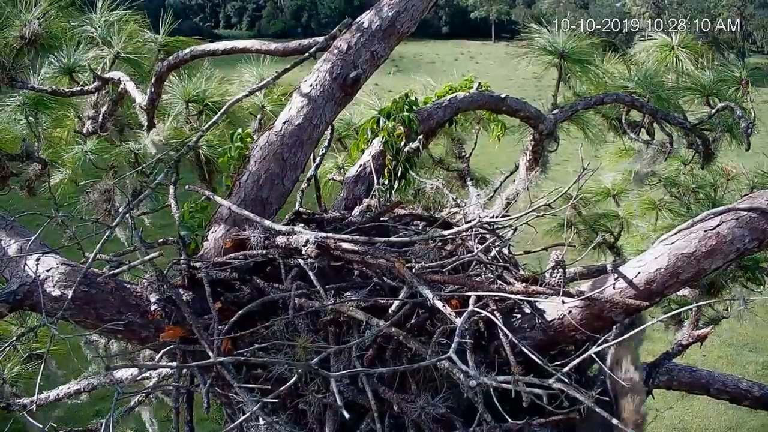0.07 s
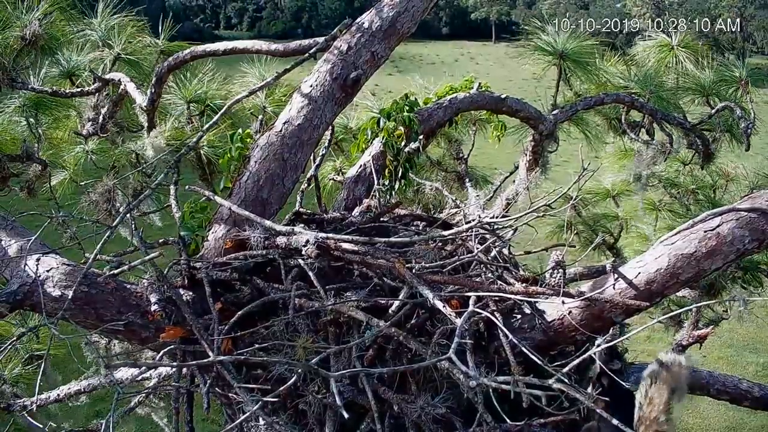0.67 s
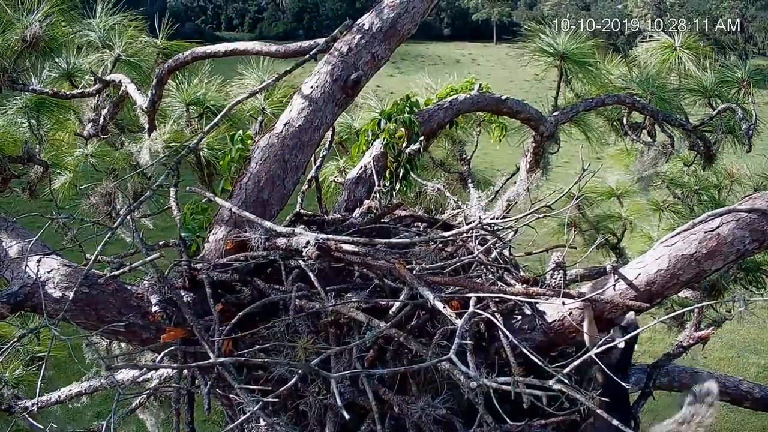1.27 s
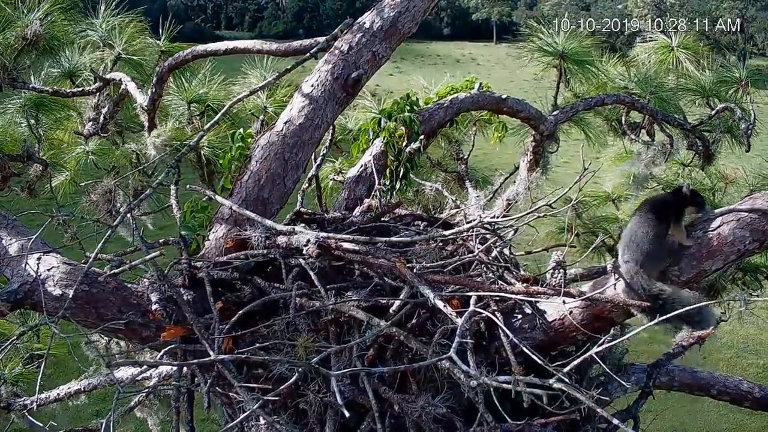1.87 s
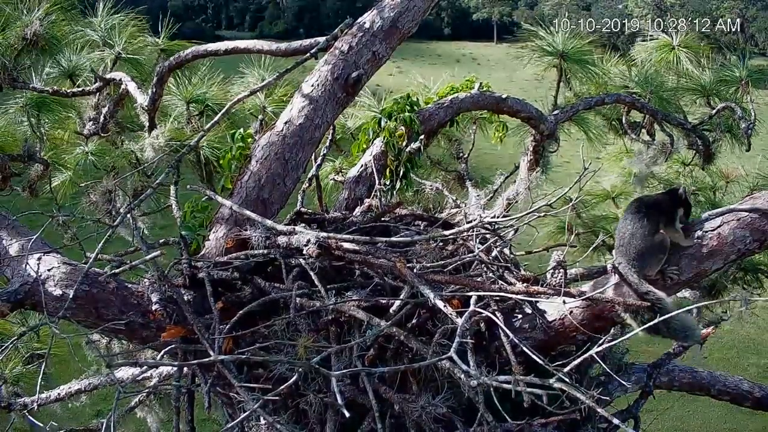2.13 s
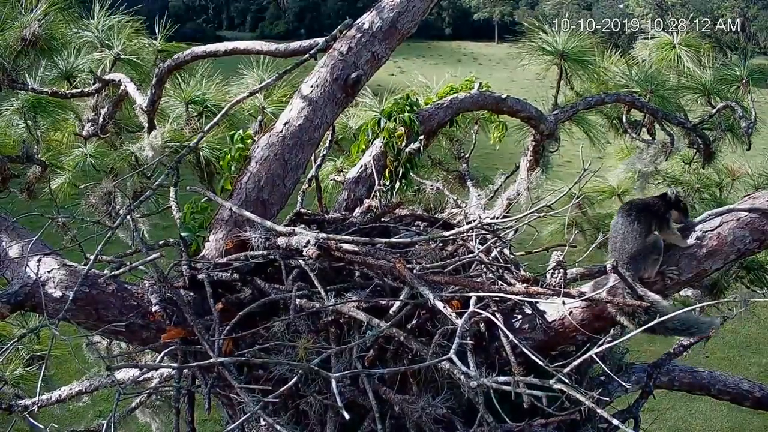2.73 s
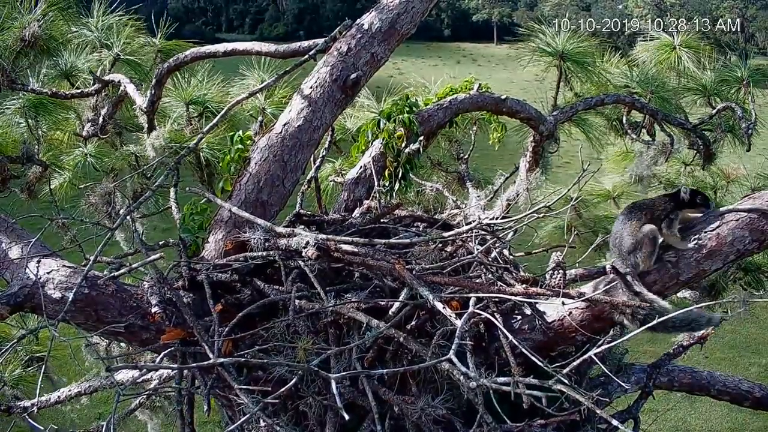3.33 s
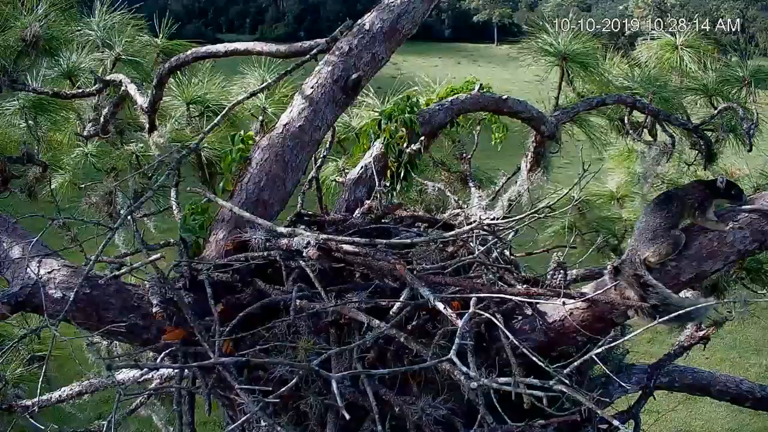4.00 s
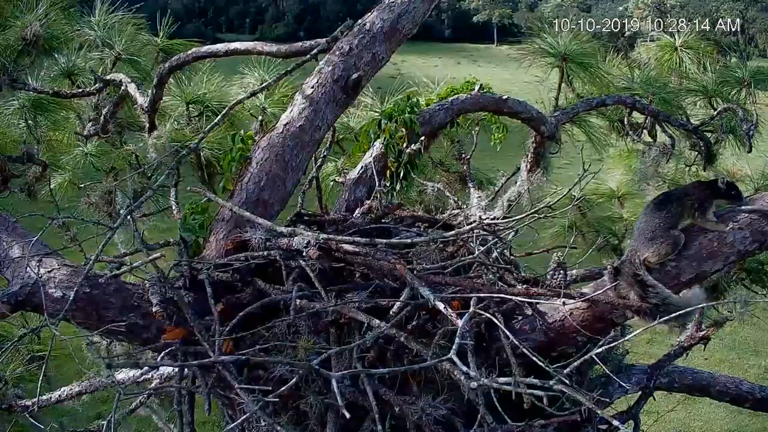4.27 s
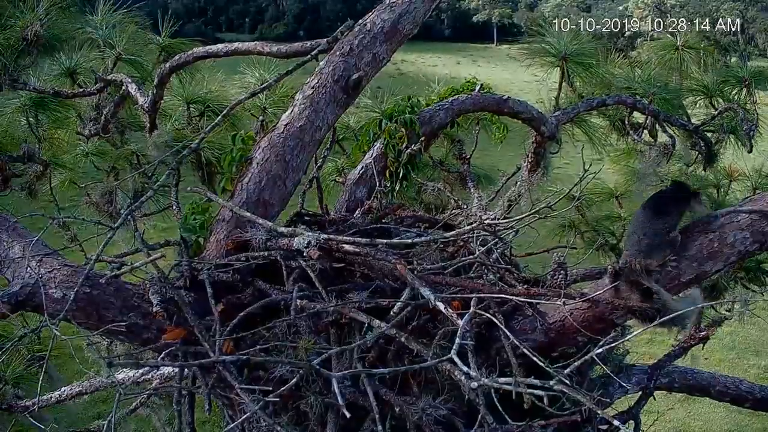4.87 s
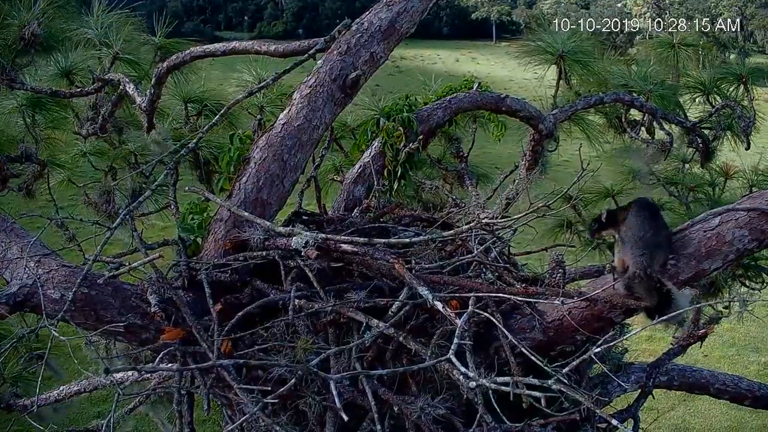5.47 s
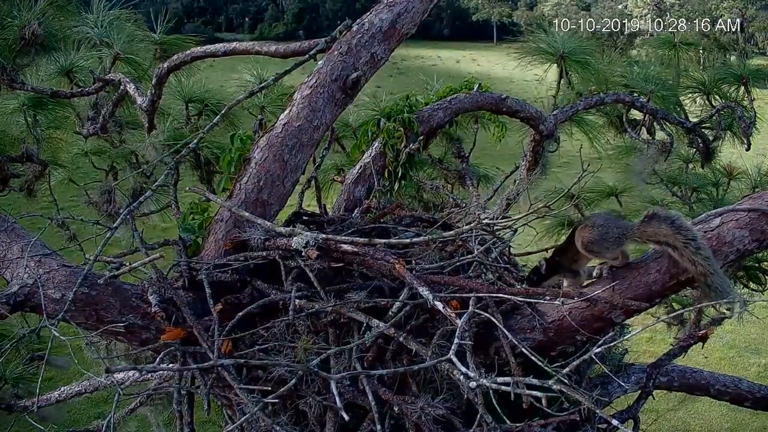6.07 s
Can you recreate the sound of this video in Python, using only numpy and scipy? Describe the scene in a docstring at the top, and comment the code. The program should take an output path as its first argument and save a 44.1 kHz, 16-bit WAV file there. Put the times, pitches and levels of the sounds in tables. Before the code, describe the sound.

Outdoors in a pine tree, one microphone picks up soft low wind, distant traffic, a far machine's hum and whine, and a faint hiss with insects. After one weak, echoing cry, a bird of prey gives five close, drawn-out screams, a little over a second apart, and starts a sixth. Each whistle jumps up, slides slowly down and rasps at its edges, ringing briefly among the trunks.

```python
"""A hawk-like bird screams again and again among pines, once faintly, then near the microphone.
Each call is a harmonic whistle that leaps up, sags slowly and drops away, rasping where the pitch
moves fast; trunks and crowns echo it. Farther off are soft wind, the tyres of distant traffic and the
hum and thin whine of a machine, with a hiss and high insects on top."""
import sys
import numpy as np
from scipy import signal
from scipy.fft import rfft, irfft, next_fast_len
from scipy.io import wavfile
from scipy.ndimage import uniform_filter1d, map_coordinates

SR = 44100
rng = np.random.default_rng(int(sys.argv[2]) if len(sys.argv) > 2 else 0)


def unload_wav(signal):
    """Save mono or channel-first audio to the path in sys.argv[1] as 16-bit WAV at rate SR, clipped to [-1, 1]."""
    wavfile.write(
        sys.argv[1],
        SR,
        np.round(np.clip(np.atleast_2d(signal).T, -1, 1) * 32767).astype(np.int16),
    )


N = 274743

# The held part of each call, between leap and drop, one list a call.
# Each row: time in seconds, fundamental in Hz, level of the second partial in dB.
CALL_HOLDS = [
    [(0.0, 1383, -63.5), (0.08, 1295, -66), (0.14, 1230, -66)],
    [(0.495, 1521, -49), (0.575, 1495, -45.5), (0.605, 1487, -51.5), (0.645, 1433, -43.5),
     (0.745, 1399, -47.5), (0.785, 1390, -71), (0.815, 1373, -53.5), (0.915, 1380, -49),
     (1.005, 1218, -53.5), (1.045, 1389, -52), (1.105, 1260, -56.5)],
    [(1.466, 1492, -45.5), (1.496, 1495, -41), (1.567, 1464, -51), (1.607, 1440, -47), (1.647, 1402, -52.0),
     (1.768, 1375, -53.0), (1.919, 1296, -63.5), (2.019, 1270, -56.5), (2.13, 1190, -62.5)],
    [(2.736, 1477, -47), (2.826, 1528, -54.5), (3.037, 1409, -41), (3.118, 1364, -53.0), (3.148, 1383, -52),
     (3.178, 1372, -59), (3.278, 1342, -52.5), (3.389, 1294, -57), (3.449, 1344, -53), (3.509, 1277, -50),
     (3.59, 1306, -57), (3.64, 1226, -55)],
    [(4.06, 1466, -42.5), (4.07, 1472, -38.5), (4.12, 1468, -53), (4.18, 1450, -47.0), (4.23, 1440, -55.0),
     (4.26, 1405, -49.5), (4.34, 1378, -47.5), (4.57, 1344, -61.5), (4.61, 1322, -52.5),
     (4.67, 1311, -58.5), (4.79, 1209, -50.5)],
    [(5.184, 1460, -48.5), (5.265, 1468, -44.5), (5.345, 1405, -42.5), (5.406, 1382, -41.5),
     (5.497, 1351, -75), (5.527, 1335, -64), (5.578, 1326, -60.5), (5.81, 1207, -56.5), (5.84, 1168, -56)],
    [(6.168, 1427, -44), (6.199, 1440, -42.5), (6.23, 1430, -45)],
]
# The voice of each call. Each row: length of the leap in seconds, then in dB how much weaker it starts,
# fundamental early and late, upper partials early and late, extra squeak in the leap and in the drop.
CALL_VOICES = [(.06, 20, -76, -74, 0, -18, 0, -8), (.056, 19, -62.5, -64, -2.5, -1, -5, -10),
               (.058, 35, -62, -79, -1, -5, 9, -7), (.064, 24, -62.5, -63, -0.5, -2, 2.5, -3),
               (.066, 20, -56, -69, 0, 0.5, 11.5, 3), (.052, 23, -59, -62, -1.5, -0.5, 9.5, 4),
               (.046, 24, -58.5, -61, 1, 3, 4, 0)]
# How the machine runs. Each row: time in seconds, relative speed, whine and hum gains in dB.
MACHINE_RUN = [(0, .997, -13, -75), (1.5, .9985, -11, -68), (2.5, .999, -7, -68), (3.3, 1, -4, -76),
               (4.1, 1, 0, -70), (4.8, 1, 1.5, -63), (5.3, .997, 1.5, -64), (6.23, .99, 2, -73)]
# The swell of the far road. Each row: time in seconds, level in dB.
TRAFFIC_SWELL = [(0, -56), (1.1, -63), (1.6, -61), (2.1, -55.5), (2.75, -53.5), (3.7, -56.5), (4.9, -61),
                 (6.23, -60)]


def bird(side_ratio=1.77, low_half_db=-11):
    """The near bird's calls; at moments its voice splits into a side tone or doubles its period."""
    # When the voice splits in each way. Each row: start in seconds, end in seconds, level in dB.
    side_tones = [(4.1, 4.22, -64), (4.4, 4.5, -75), (5.41, 5.49, -67), (5.57, 5.66, -72)]
    doublings = [(.62, .8, -72), (4.36, 4.52, -71), (5.36, 5.5, -69)]
    pitch = curves(np.concatenate(CALL_HOLDS))[0]
    half_partials = tone(2.5 * pitch) + amp(low_half_db) * tone(1.5 * pitch)
    unsteady = amp(2.5 * wobble(60))
    split = spells(side_tones) * tone(side_ratio * pitch) + spells(doublings) * half_partials
    calls = sum(scream(hold, voice) for hold, voice in zip(CALL_HOLDS[1:], CALL_VOICES[1:]))
    return calls + unsteady * split


def scream(hold, voice, drop_fade_db=13.5, upper_swing_db=3):
    """One call: a harmonic whistle whose second partial carries; it rasps in the quick leap and drop."""
    leap_s, weak_db, first_early, first_late, upper_early, upper_late, leap_db, drop_db = voice
    pitch, leap, drop = pitch_arc(hold, leap_s)
    gate = np.clip((1 - leap - drop) / .21, 0, 1)
    first_db, upper_db = curves([(hold[0][0], first_early, upper_early),
                                 (hold[-1][0], first_late, upper_late)])
    second_db = curves(hold)[1] - weak_db * np.sqrt(leap) - drop_fade_db * drop
    # the membrane loses its steady swing while the pitch changes fast
    sweep_hz_per_s = uniform_filter1d(np.abs(np.gradient(pitch)) * SR, size=600)
    rasp = np.clip(sweep_hz_per_s / 8500, 0, 1) ** 2
    pitch = pitch * (1 + .0028 * wobble(22) + .0033 * wobble(130))  # slow waver, quick jitter
    pitch = pitch * (1 + .014 * rasp * wobble(500))
    rasp_db = rasp * (3 * wobble(300) - 1)
    # the whistle flutters more deeply where it is blown weakly
    flutter_db = np.interp(second_db, [-60, -45], [4.4, 1.2])
    squeak_db = leap_db * np.minimum(6 * leap, 1) + drop_db * np.minimum(6 * drop, 1)
    uppers = [upper_db + throat(k * pitch, squeak_db) + upper_swing_db * wobble(16) for k in (3, 4, 5)]
    return gate * sum(amp(db + rasp_db + flutter_db * np.minimum(wobble(75), 1)) * tone(k * pitch)
                      for k, db in enumerate([first_db, second_db] + uppers, 1))


def pitch_arc(hold, leap_s, leap_depth=.44, leap_bend=1.4, drop_s=.064, drop_depth=.33, drop_bend=1.8):
    """The pitch through leap, hold and drop, and how deep in the leap and the drop the call is (0-1)."""
    t = np.arange(N) / SR
    leap = np.clip((hold[0][0] - t) / leap_s, 0, 1)
    drop = np.clip((t - hold[-1][0]) / drop_s, 0, 1)
    pitch = curves(hold)[0] * (1 - leap_depth * leap ** leap_bend - drop_depth * drop ** drop_bend)
    return pitch, leap, drop


def throat(hz, squeak_db, squeak_hz=3900, width_hz=490):
    """The throat's gain in dB; upper partials squeak as they sweep through its resonance."""
    # What it passes of the third and higher partials. Each row: frequency in Hz, gain in dB.
    passband = [(2400, -77), (2900, -62.5), (3400, -57.5), (3800, -58.5), (4100, -61.5), (4500, -65.5),
                (4900, -70.5), (5600, -77.5), (6200, -79), (7200, -89.5)]
    return along(passband, hz) + squeak_db * np.exp(-.5 * ((hz - squeak_hz) / width_hz) ** 2)


def pines(calls, build_s=.0078):
    """Trunks and crowns scatter a call; the echo of its higher start beats against the sagging pitch."""
    # How long the wood rings. Each row: frequency in Hz, seconds to fade by 60 dB.
    ring_times = [(1000, 0.34), (3000, 1), (8000, 1)]
    hz, t, noise = signal.stft(rng.standard_normal(SR), SR, nperseg=256)
    envelope = amp(-60 * t / along(ring_times, hz)[:, None]) * (1 - np.exp(-t / build_s))
    tail = signal.istft(noise * envelope, SR, nperseg=256)[1]
    return signal.fftconvolve(calls, tail / np.linalg.norm(tail))[:N]


def machine(whine_trim_db=-1.5, hum_trim_db=-3.5, whine_fading_db=3.5, hum_fading_db=2):
    """A far engine hums and whines; moving air on the way makes each line fade by itself."""
    # The rotor's strong lines, its weak high lines and the engine's hum.
    # Each row: frequency in Hz, relative level in dB.
    rotor_lines = [(3488, -68), (3564, -81), (3833, -70), (3967, -71), (4070, -62), (4177, -64),
                   (4549, -66.5), (4657, -79), (4986, -90), (5028, -70), (5136, -72.5), (5507, -76),
                   (5987, -79.5)]
    high_lines = [(6228, -84), (6465, -90), (6708, -90), (6944, -83.5), (7187, -81.5), (7424, -82),
                  (7531, -87), (7628, -91), (7666, -80), (7773, -88), (8010, -87), (8145, -84.5),
                  (8247, -86.5)]
    hum_lines = [(68, -6), (102.3, 1), (120, -11.5), (136, -19), (204, -9), (239, -11)]
    speed, whine_db, hum_db = curves(MACHINE_RUN)
    speed = speed * (1 + .0001 * wobble(11))
    whine = sum(amp(db + whine_fading_db * wobble(2.95)) * tone(hz * speed)
                for hz, db in rotor_lines + high_lines)
    hum = sum(amp(db + hum_fading_db * wobble(6)) * tone(hz * speed * (1 + .0029 * wobble(4.03)))
              for hz, db in hum_lines)
    return amp(whine_db + whine_trim_db) * whine + amp(hum_db + hum_trim_db) * hum


def wind(level_db=-56.5, follow=.34):
    """Soft wind, a low rush that rises and falls a little with the traffic."""
    # The colour of the air. Each row: frequency in Hz, relative density in dB.
    air_spectrum = [(15, -47), (25, -25), (55, -9), (120, -9), (170, -11), (280, -9), (520, -7.5),
                    (720, -6), (900, -1), (1100, -8.5), (1300, -13), (1600, -20.5), (2600, -34.5),
                    (4500, -120)]
    swell_db, = curves(TRAFFIC_SWELL)
    return amp(level_db + follow * (swell_db - swell_db.mean())) * rush(air_spectrum, patchy_db=.5)


def traffic():
    """Tyres on a far road: a narrow roar that swells and ebbs."""
    # The colour of the roar. Each row: frequency in Hz, relative density in dB.
    tyre_spectrum = [(450, -34), (650, -8.5), (800, -7.5), (930, -0.5), (1050, -7), (1200, -22),
                     (1500, -34), (2500, -120)]
    return amp(curves(TRAFFIC_SWELL)[0]) * rush(tyre_spectrum, patchy_db=1)


def hiss(level_db=-61, follow=.18):
    """A broad hiss that grows with the machine's whine."""
    # The colour of the hiss. Each row: frequency in Hz, relative density in dB.
    hiss_spectrum = [(1200, -10), (2000, -9), (3000, 0), (3900, 3), (4600, -3), (5500, -10), (6500, -15),
                     (8000, -15.5), (9000, -15.5), (11200, -24), (14500, -25.5), (15700, -38)]
    whine_db = curves(MACHINE_RUN)[1]
    return amp(level_db + follow * whine_db) * rush(hiss_spectrum, patchy_db=1.8)


def insects(level_db=-76):
    """Faint insects: a flickering band of noise around 9.5 kHz."""
    # Their band. Each row: frequency in Hz, relative density in dB.
    insect_spectrum = [(8200, -21), (9000, -12.5), (9500, -5), (10200, -12), (10700, -16), (11300, -26)]
    return amp(level_db) * rush(insect_spectrum, patchy_db=3)


def amp(db):
    """Decibels to gain."""
    return 10 ** (np.asarray(db) / 20)


def unit(x):
    """Scale to rms 1."""
    return x / np.sqrt(np.mean(x ** 2) + 1e-20)


def along(points, hz):
    """Read (Hz, value) points at hz, on a log frequency axis."""
    point_hz, values = np.transpose(points)
    return np.interp(np.log(hz + 1), np.log(point_hz + 1), values)


def curves(rows):
    """One value per sample for each column after the time."""
    times, *columns = np.transpose(rows)
    return [np.interp(np.arange(N) / SR, times, column) for column in columns]


def spells(rows, edge_s=.03):
    """A gain that swells and fades for each (start s, end s, dB) row."""
    t = np.arange(N) / SR
    return sum(amp(db) * np.clip(np.minimum(t - start, end - t) / edge_s + .5, 0, 1)
               for start, end, db in rows)


def wobble(rate):
    """A smooth random curve, rate knots a second."""
    coarse = np.arange(0, N + 32, 32)
    knots = rng.standard_normal(int(N * rate / SR) + 4)
    return np.interp(np.arange(N), coarse, map_coordinates(knots, [coarse * rate / SR], mode="nearest"))


def tone(hz):
    """A sine of rms 1 that follows a frequency curve."""
    return np.sqrt(2) * np.sin(2 * np.pi * (np.cumsum(hz) / SR + rng.random()))


def filtered(x, response):
    """Filter x by a gain given as a function of Hz."""
    size = next_fast_len(N + SR // 2)
    return irfft(rfft(x, size) * response(np.fft.rfftfreq(size, 1 / SR)), size)[:N]


def rush(spectrum, patchy_db):
    """Coloured noise of rms 1 with patches of random gain in frequency and time."""
    noise = signal.stft(rng.standard_normal(N), nperseg=512)[2]
    patches = uniform_filter1d(rng.standard_normal(noise.shape), size=4, axis=0)
    patches = uniform_filter1d(patches, size=10, axis=1)
    patchy = signal.istft(noise * amp(patchy_db * unit(patches)), nperseg=512)[1][:N]
    return unit(filtered(patchy, lambda hz: amp(along(spectrum, hz))))


def scene(echo_db=-9.5, faint_db=-5, faint_echo_db=-2):
    """Near calls and their echo over the far background; the faint first call arrives mostly as echo."""
    near = bird()
    faint = scream(CALL_HOLDS[0], CALL_VOICES[0])
    direct = near + amp(faint_db) * faint
    echo = pines(amp(echo_db) * near + amp(faint_echo_db) * faint)
    return (direct + echo + machine() + wind() + traffic() + hiss() + insects())[None]


def record(dry, top_hz=15700):
    """One microphone among the trees; nothing above top_hz is kept."""
    return filtered(dry[0], lambda hz: hz < top_hz)[None]


dry = scene()
out = record(dry)
unload_wav(out)
```